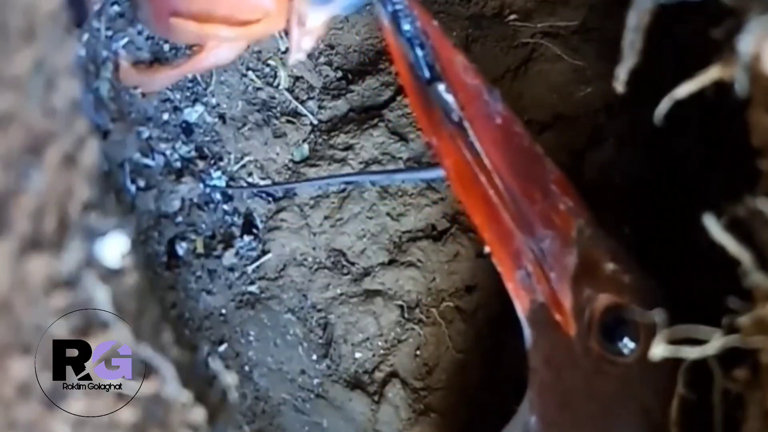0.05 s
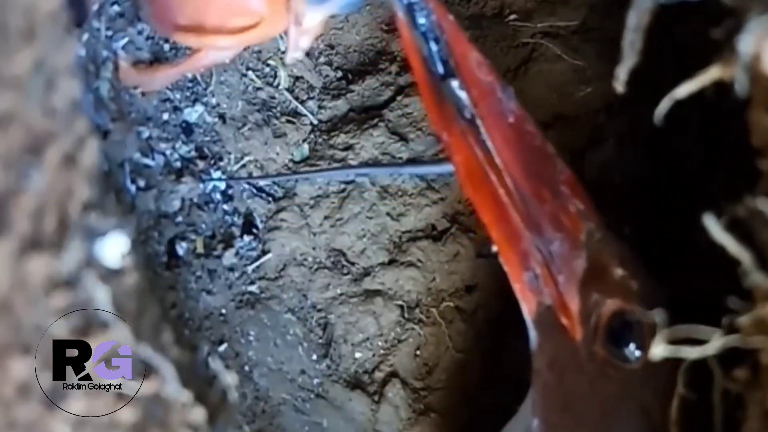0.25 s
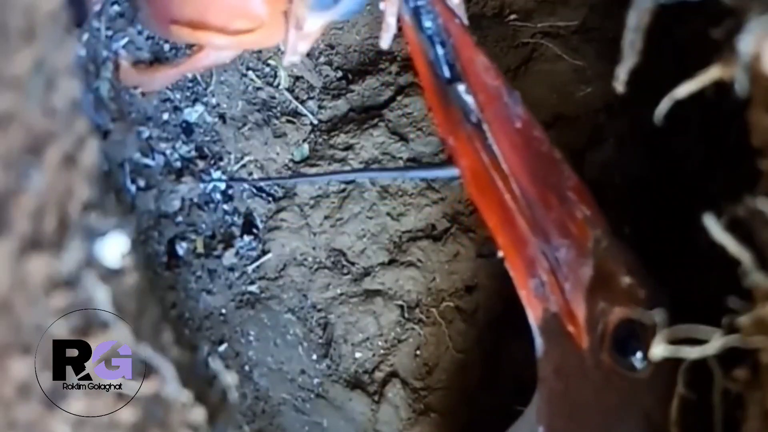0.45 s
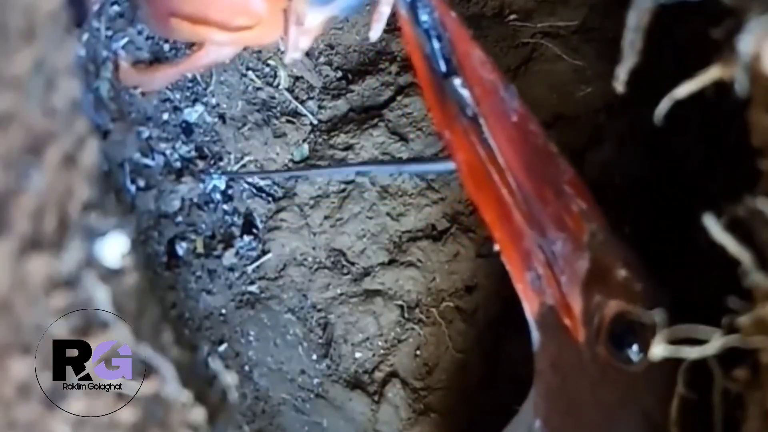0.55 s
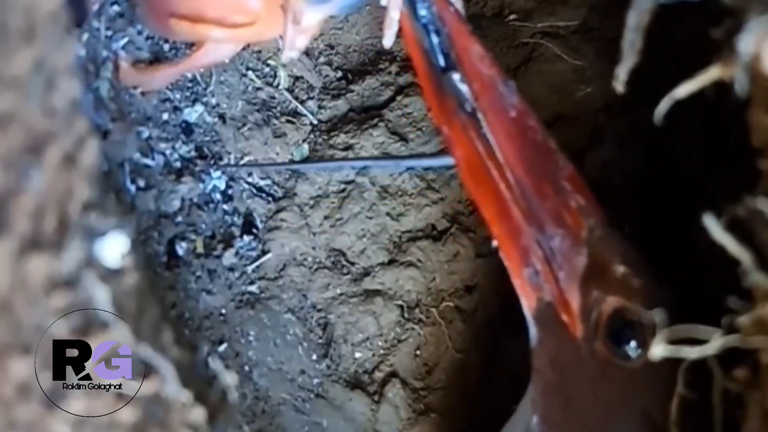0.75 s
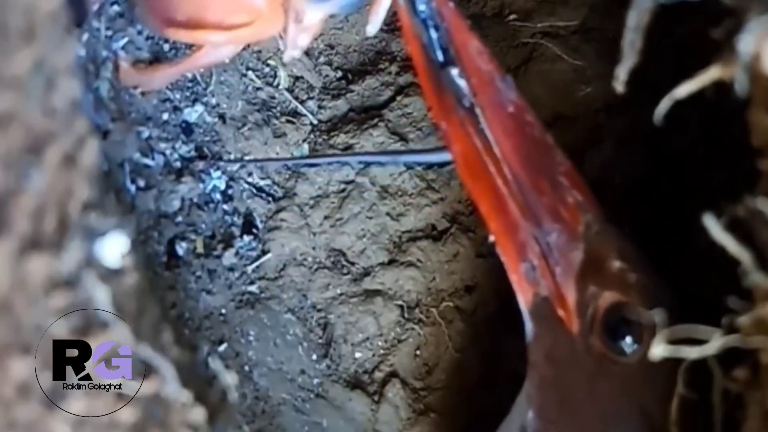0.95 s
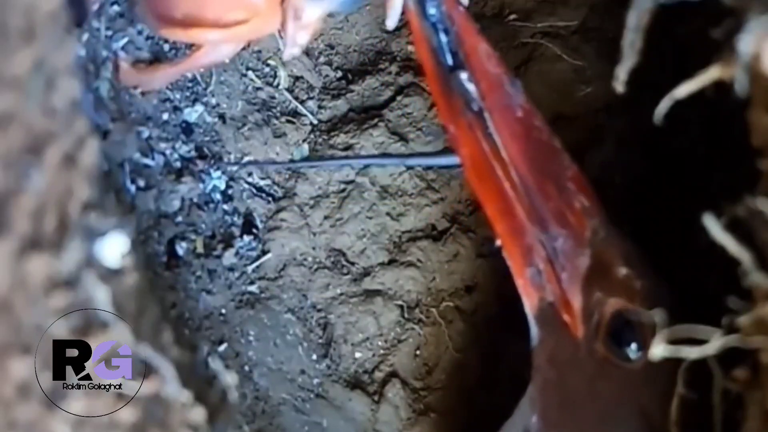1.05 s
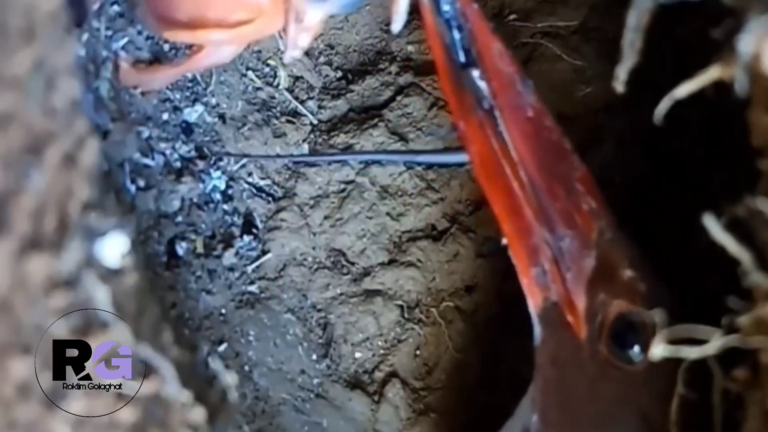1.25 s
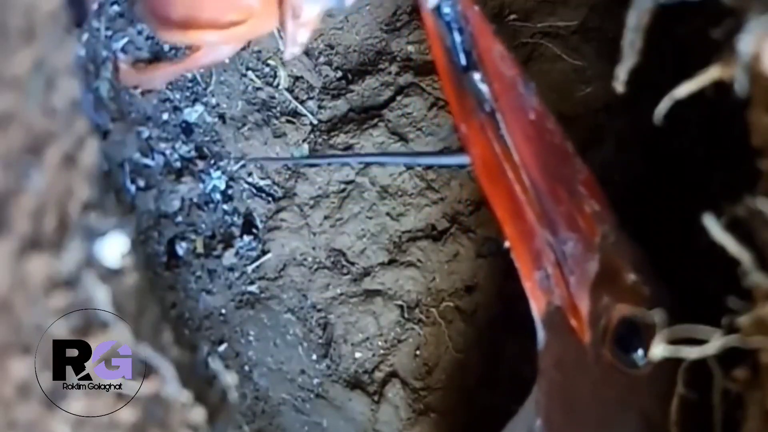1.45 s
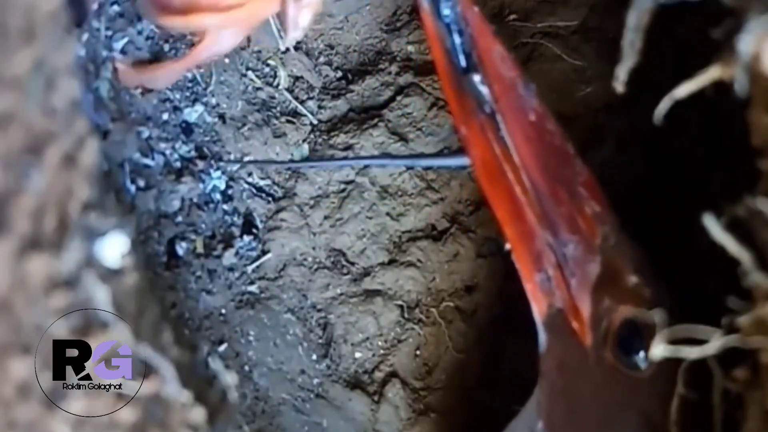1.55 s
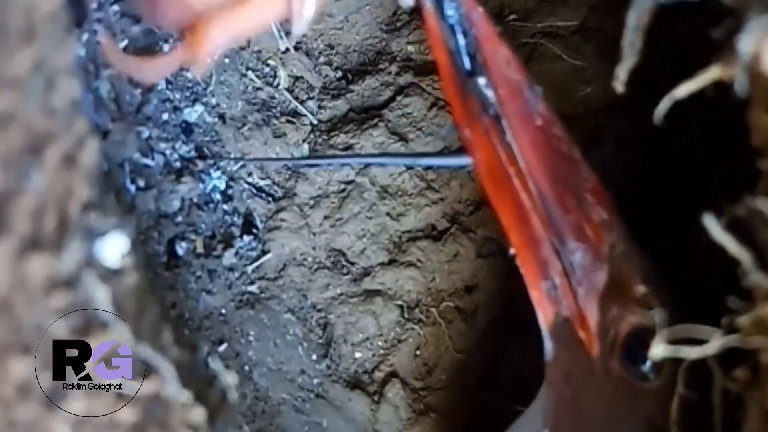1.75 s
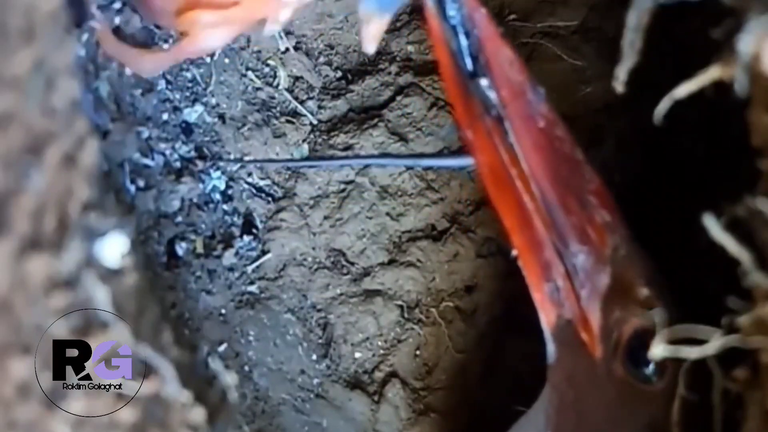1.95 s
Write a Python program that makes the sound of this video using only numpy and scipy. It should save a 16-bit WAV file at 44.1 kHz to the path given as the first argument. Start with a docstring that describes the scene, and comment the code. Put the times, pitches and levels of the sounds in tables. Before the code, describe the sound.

A bird gives two short rising chirps close by, over low handling rumble and bumps.

```python
"""From the start, a hand covering a camera's right microphone port makes a low rumble over faint hiss.
At 0.09 s a bird held at the mouth of an earth burrow, close to the left port, gives a short rising
chirp: a whistle with two rough overtones, reflected by the earth walls. Just after 0.2 s the hand
shifts, with a cluster of dull bumps and a rub of skin; weaker ones follow. The bird chirps again at
0.91 s, and the rumble goes on, with a few more bumps and rubs, to the end at 2 s."""
import sys
import numpy as np
from scipy import signal
from scipy.fft import rfft, irfft, next_fast_len
from scipy.io import wavfile
from scipy.ndimage import uniform_filter1d, minimum_filter1d, map_coordinates

SR = 44100
rng = np.random.default_rng(int(sys.argv[2]) if len(sys.argv) > 2 else 0)


def transcribe(signal):
    """Save signal, clipped to [-1, 1], as a 16-bit WAV file at the path in sys.argv[1]."""
    frames = np.atleast_2d(signal).T
    limited = np.clip(frames, -1, 1)
    pcm = np.round(limited * 32767).astype(np.int16)
    wavfile.write(sys.argv[1], SR, pcm)


N = 88200
T = np.arange(N) / SR

# Levels in all tables are relative.
# Spectra of the hiss at each port: f/Hz, level/dB
LEFT_HISS_SPECTRUM = [(100, -5), (700, 5), (1600, 1.5), (2500, 1), (5000, -0.5), (6600, -3.5), (8100, 3),
                      (9600, -2), (12000, 0), (14500, -3)]
RIGHT_HISS_SPECTRUM = [(100, 7), (2500, -2.5), (5000, 1), (6600, -8), (8100, 2), (9600, -5.5), (12000, 3),
                       (14500, 0.5)]
# Envelopes of the rumble (deep band, upper band, through the case to the left port): t/s, level/dB
DEEP_ENVELOPE = [(0, -36), (.12, -33), (.3, -31.5), (.4, -23.5), (.47, -27.5), (.53, -21.5), (.6, -30.5),
                 (.67, -20.5), (.77, -28), (.88, -31), (.97, -23), (1.07, -30), (1.2, -29.5), (1.36, -40),
                 (1.45, -23.5), (1.6, -40.5), (1.73, -28), (1.85, -22.5), (1.93, -33), (2, -31)]
UPPER_ENVELOPE = [(0, -29), (.1, -31.5), (.28, -29), (.46, -31.5), (.66, -30.5), (.76, -32.5), (.88, -32),
                  (1.0, -30), (1.17, -32.5), (1.32, -30), (1.5, -31), (1.58, -33), (1.67, -31.5),
                  (1.9, -31.5), (2, -30)]
CASE_ENVELOPE = [(0, -51), (.1, -46), (.22, -46), (.33, -45), (.42, -46), (.55, -47), (.75, -51), (.9, -48),
                 (.95, -47), (1.05, -44), (1.12, -53), (1.3, -48.5), (1.55, -49), (1.88, -48), (1.96, -47),
                 (2, -46)]
# Spectra of the same three rumbles: f/Hz, level/dB
DEEP_SPECTRUM = [(12, -20), (22, -16), (35, -5), (55, 5.5), (72, 0.5), (95, -10.5), (140, -13), (300, -62)]
UPPER_SPECTRUM = [(50, -20), (90, -2), (130, 2), (200, -4), (300, -8.5), (450, -14.5), (700, -22),
                  (1000, -27), (1600, -36), (2500, -39.5), (4500, -50.5), (9000, -59)]
CASE_SPECTRUM = [(15, -15), (35, -29), (55, 0), (90, 15), (140, 1.5), (200, 5.5), (300, -11), (450, -15),
                 (1000, -46), (4000, -82)]
# Contour of the fundamental, one table per chirp: t/s, f/Hz, level/dB
CHIRP_CONTOURS = [
    [(.091, 1853, -49), (.098, 1810, -47), (.1048, 2050, -49), (.107, 2207, -34), (.116, 2425, -35),
     (.121, 2640, -43), (.125, 2730, -35.5), (.129, 2760, -43), (.136, 2885, -39), (.149, 3050, -46),
     (.161, 3185, -44), (.174, 3250, -58)],
    [(.911, 1980, -48), (.918, 2395, -41), (.926, 2670, -43.5), (.941, 2850, -40), (.953, 2950, -41),
     (.966, 3280, -40.5), (.976, 3153, -40), (.995, 3250, -41), (1.018, 3110, -42)],
]
# Timbre, one row per chirp: overtone level/dB, rasp level/dB, overtone entry time/s
CHIRP_TIMBRES = [(-2.5, -22, .001), (2.5, -18, 0.0083)]
# Spectra of the bird's overtones and airy rasp: f/Hz, level/dB
SECOND_HARMONIC = [(3600, -1), (4100, -3), (4600, -11), (5300, -12), (5600, -20), (6050, -16), (6600, -25)]
THIRD_HARMONIC = [(5500, -30), (7000, -27), (8400, -23.5), (9800, -29)]
RASP_SPECTRUM = [(1200, -28), (1900, 3), (2700, 9.5), (3800, -14), (5200, 3.5), (6500, -9), (8200, -3),
                 (11000, -20)]
# Responses of the reverberant surroundings and of the covered port to the bird: f/Hz, gain/dB
TAIL_RESPONSE = [(1500, -5), (2700, -7), (3150, -5.5), (3500, -5), (4500, 4), (8000, 11)]
COVERED_RESPONSE = [(2000, -36), (3200, -49), (4500, -16), (6000, -11), (9000, -17)]
# Bumps of the hand on the case: t/s, level/dB, f/Hz, T60/s, contact time/s
HAND_BUMPS = [(0.2111, -9.5, 302, 0.035, 0.00038), (.2140, -4.5, 300, 0.017, 0.00063),
              (0.2172, -12.5, 253, 0.042, 0.0008), (0.2221, -9.5, 230, 0.029, 0.00073),
              (0.2269, -0.5, 136, 0.0328, 0.00085), (0.2277, -8.5, 47.3, 0.078, 0.0011),
              (0.604, -17, 147, 0.054, 0.0017), (0.658, -19, 58.6, 0.097, 0.0045),
              (0.798, -19.5, 140, 0.034, 0.00033), (1.1154, -11, 113, 0.038, 0.0003),
              (1.1359, -15.5, 260, 0.005, 0.00029), (1.4386, -10.5, 190, 0.026, 0.0016),
              (1.4492, -17.5, 203, 0.018, 0.00046), (1.824, -18, 275, 0.024, 0.00089)]
# Muffling of the bumps by the finger: f/Hz, gain/dB
SKIN_RESPONSE = [(700, -1), (1800, -1.5), (3000, -7), (5000, -24), (9000, -45)]
# Strokes of skin over the case: t/s, rise/s, fall/s, level/dB
RUB_STROKES = [(0.211, 0.0022, 0.01, -31), (.227, 0.0052, .002, -25), (0.243, 0.015, 0.022, -38.5),
               (.492, 0.017, 0.0071, -40.5), (1.14, 0.011, 0.02, -44), (1.445, .006, 0.015, -44.5),
               (1.527, .014, 0.0075, -46), (1.845, 0.015, 0.0095, -41.5)]
# Spectrum of their friction noise: f/Hz, level/dB
RUB_SPECTRUM = [(200, -12), (450, 3.5), (750, 3), (1400, -10), (2600, -22.5), (4500, -36.5), (9000, -44)]


def amp(db):
    """Amplitude ratio of a level in decibels."""
    return 10 ** (np.asarray(db) / 20)


def level_at(spectrum, hz):
    """Level interpolated on a logarithmic frequency axis."""
    f, db = np.transpose(spectrum)
    return np.interp(np.log(hz + 1), np.log(f + 1), db)


def curves(rows):
    """Linear interpolation in time: one value per sample for each column after the first."""
    times, *columns = np.transpose(rows)
    return [np.interp(T, times, column) for column in columns]


def wobble(knots_per_s):
    """Smooth random modulation: a spline through Gaussian values."""
    return map_coordinates(rng.standard_normal(N // 8), [T * knots_per_s], mode="wrap")


def filtered(x, response):
    """Linear filtering: the spectrum of x is multiplied by a frequency response."""
    size = next_fast_len(N + SR // 2)
    return irfft(rfft(x, size) * response(np.fft.rfftfreq(size, 1 / SR)), size)[..., :N]


def shaped(x, spectrum):
    """Spectral shaping by a table of f/Hz, gain/dB."""
    return filtered(x, lambda hz: amp(level_at(spectrum, hz)))


def noise(spectrum):
    """Coloured noise: white noise, filtered and scaled to rms 1."""
    x = shaped(rng.standard_normal(N), spectrum)
    return x / np.sqrt(np.mean(x ** 2) + 1e-20)


def hiss(left_db=-59, right_db=-57):
    """Microphone self-noise: steady, and uncorrelated between the ports."""
    return np.array([amp(left_db) * noise(LEFT_HISS_SPECTRUM),
                     amp(right_db) * noise(RIGHT_HISS_SPECTRUM)])


def port_rumble(deep_trim_db=-2, upper_trim_db=-1.5):
    """Handling noise: the hand on the right port gives two amplitude-modulated low bands."""
    (deep_db,), (upper_db,) = curves(DEEP_ENVELOPE), curves(UPPER_ENVELOPE)
    deep = amp(deep_db + deep_trim_db) * noise(DEEP_SPECTRUM)
    upper = amp(upper_db + upper_trim_db + 0.65 * wobble(30.08)) * noise(UPPER_SPECTRUM)
    return deep + upper


def case_rumble(trim_db=-2.5):
    """Structure-borne sound: the hand's rumble as the case carries it to the open left port."""
    (db,) = curves(CASE_ENVELOPE)
    return amp(db + trim_db) * noise(CASE_SPECTRUM)


def chirp(contour, overtone_db, rasp_db, entry_s):
    """Frequency modulation: a whistle of three harmonics glides upward, with flutter and a little rasp."""
    edge_s, pitch_jitter, smear_rad = 0.0016, 0.0118, 0.3
    flutter_db, overtone_flutter_db, flutter_per_s = -1.64, 3, 290
    start, end = contour[0][0], contour[-1][0]
    pitch, db = curves(contour)
    phase = 2 * np.pi * np.cumsum(pitch * (1 + pitch_jitter * wobble(700))) / SR
    voice = np.sin(phase) + amp(rasp_db) * noise(RASP_SPECTRUM)
    entry = np.clip((T - start) / entry_s, 0, 1) ** 2
    for k, spectrum in enumerate((SECOND_HARMONIC, THIRD_HARMONIC), 2):
        swing_db = overtone_flutter_db * wobble(flutter_per_s)
        gain = amp(overtone_db + level_at(spectrum, k * pitch) + swing_db)
        voice += entry * gain * np.sin(k * phase + smear_rad * wobble(900))
    gate = np.clip(np.minimum(T - start, end - T) / edge_s + .5, 0, 1)
    return np.sqrt(2) * gate * amp(db + flutter_db * wobble(flutter_per_s)) * voice


def reverberation(x, t60_s):
    """Diffuse reflection: convolution with exponentially decaying noise of unit energy."""
    t = T[:SR // 2]
    response = rng.standard_normal(len(t)) * amp(-60 * t / t60_s)
    return signal.fftconvolve(x, response / np.linalg.norm(response))[:N]


def bird(wall_db=-12.5, left_tail_db=-14.5, right_tail_db=-16, wall_t60_s=0.021, tail_t60_s=0.32):
    """Direct and reflected sound: near walls answer briefly, the surroundings for longer."""
    direct = sum(chirp(contour, *timbre) for contour, timbre in zip(CHIRP_CONTOURS, CHIRP_TIMBRES))
    far = shaped(direct, TAIL_RESPONSE)
    walls = amp(wall_db) * reverberation(direct, wall_t60_s)
    left = direct + walls + amp(left_tail_db) * reverberation(far, tail_t60_s)
    right = shaped(direct, COVERED_RESPONSE) + amp(right_tail_db) * reverberation(far, tail_t60_s)
    return np.array([left, right])


def bumps():
    """Damped oscillation: each soft push on the covered port builds up, swings back and dies away."""
    pressure = np.zeros(N)
    for peak_s, db, hz, t60_s, contact_s in HAND_BUMPS:
        age = np.maximum(T - peak_s, 0)
        push = np.exp(-np.maximum(peak_s - T, 0) / contact_s)
        pressure -= amp(db - 60 * age / t60_s) * push * np.cos(2 * np.pi * hz * age)
    return shaped(pressure, SKIN_RESPONSE)


def rubs(grain_db=-0.5):
    """Sliding friction: skin on the case gives brief swells of dull noise."""
    swell = np.zeros(N)
    for peak_s, rise_s, fall_s, db in RUB_STROKES:
        width_s = np.where(T < peak_s, rise_s, fall_s)
        swell += amp(db) * np.exp(-.5 * ((T - peak_s) / width_s) ** 2)
    return swell * amp(grain_db * wobble(180)) * noise(RUB_SPECTRUM)


def scene(leak_db=-42):
    """Superposition at the two ports; a little of the hand's sound leaks through the case to the left."""
    chirps = bird()
    hand_right = port_rumble() + bumps() + rubs()
    hand_left = case_rumble() + amp(leak_db) * hand_right
    return hiss() + np.array([hand_left, hand_right]) + chirps


def record(dry, ceiling=0.95, window_samples=221, top_hz=14550):
    """Peak and band limiting: a smoothed gain holds peaks down, then a low-pass cuts the top treble."""
    needed_gain = np.minimum(1, ceiling / (np.abs(dry) + 1e-9))
    held_gain = minimum_filter1d(needed_gain, size=window_samples)
    gain = uniform_filter1d(held_gain, size=window_samples)
    return filtered(dry * gain, lambda hz: hz < top_hz)


dry = scene()
out = record(dry)
transcribe(out)
```